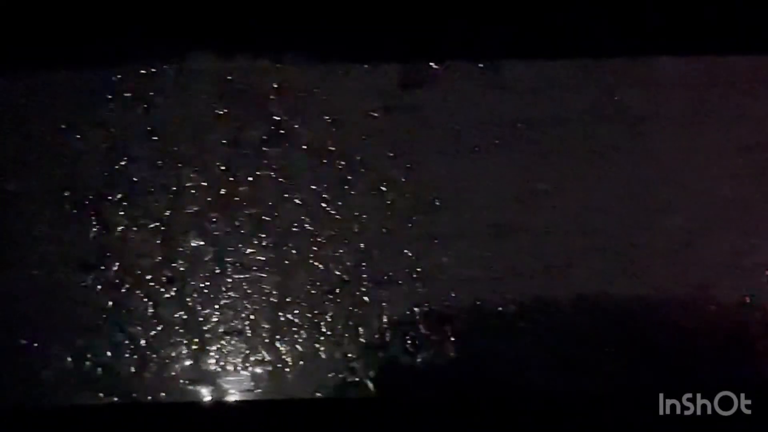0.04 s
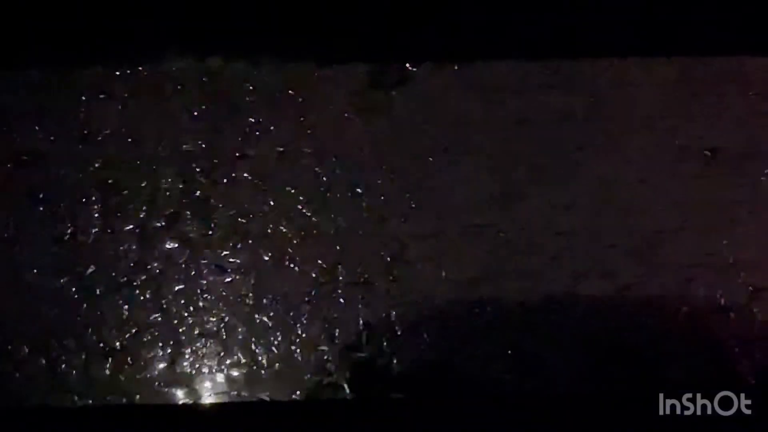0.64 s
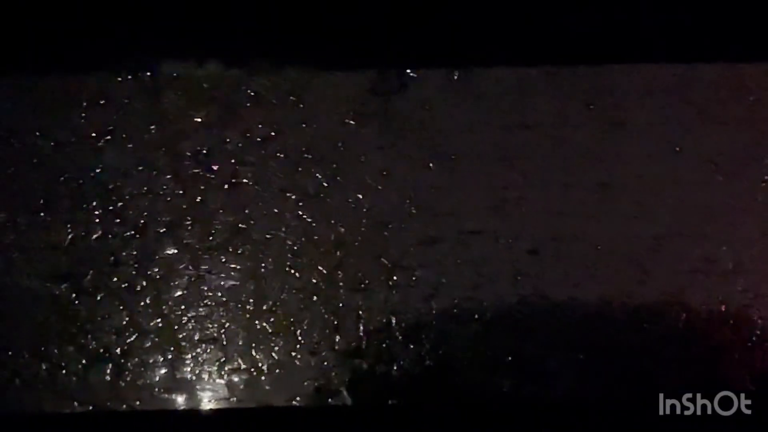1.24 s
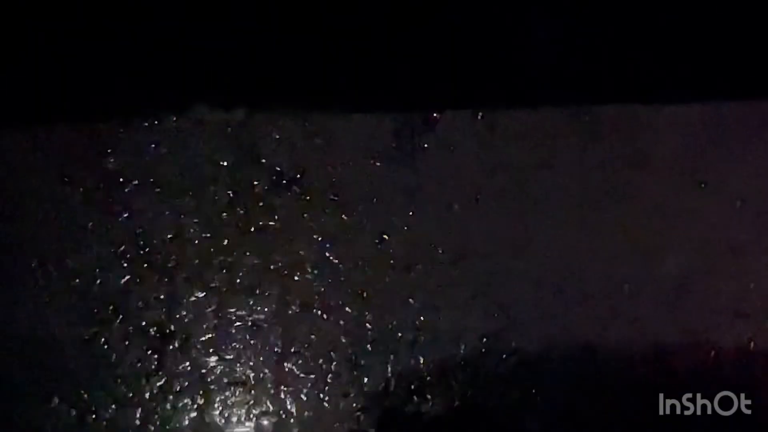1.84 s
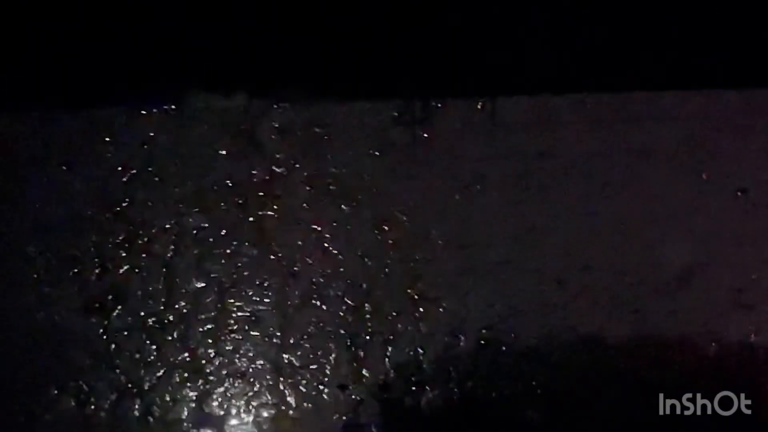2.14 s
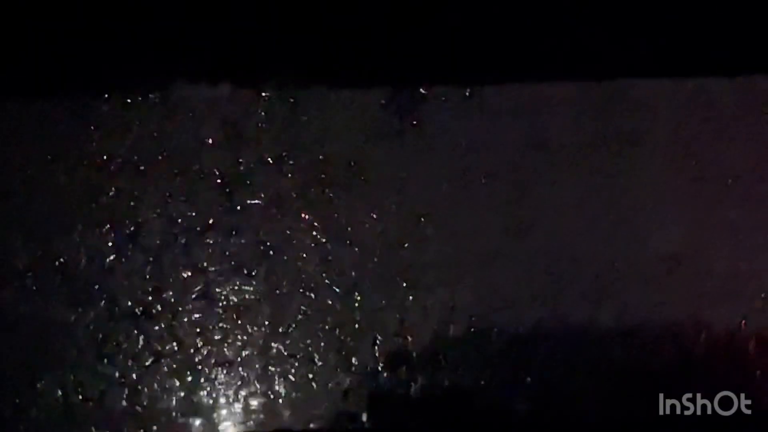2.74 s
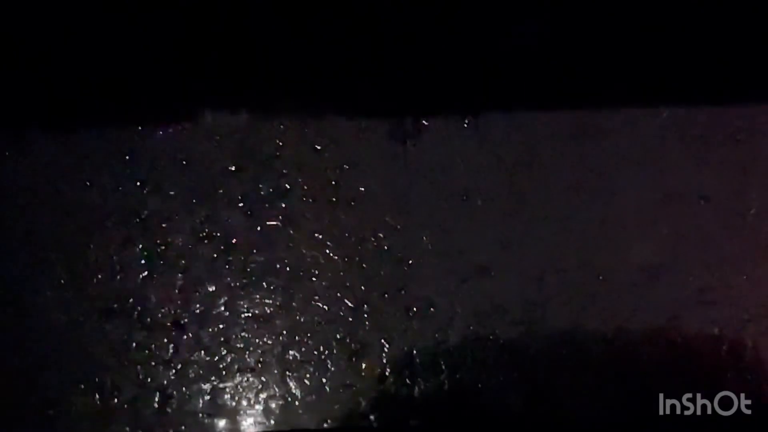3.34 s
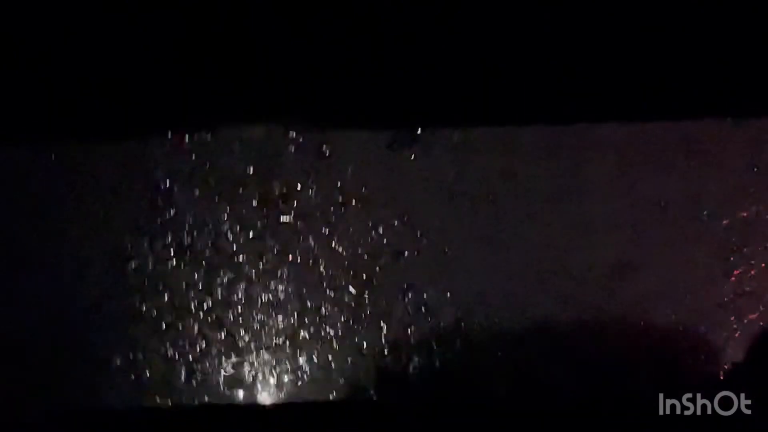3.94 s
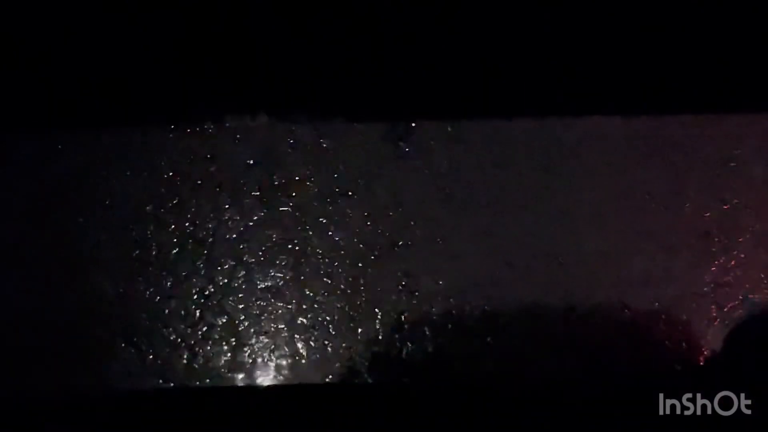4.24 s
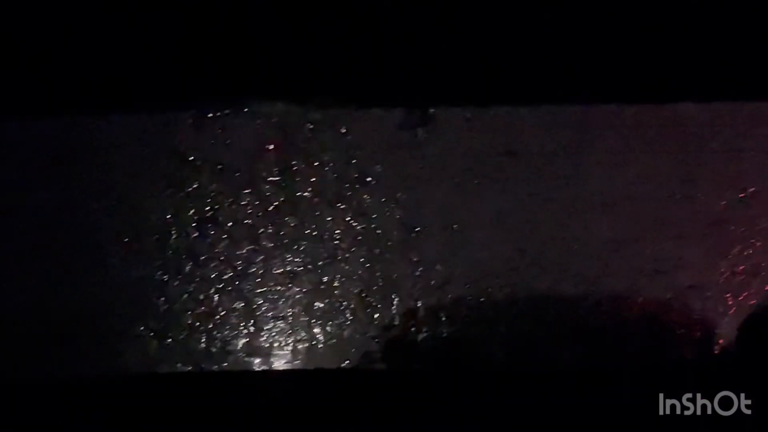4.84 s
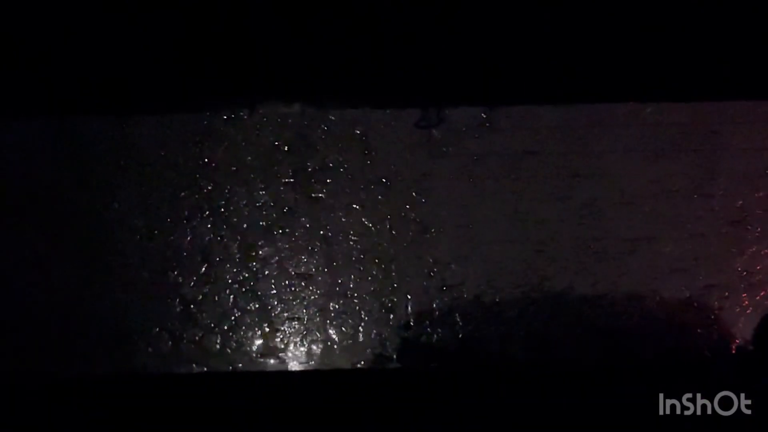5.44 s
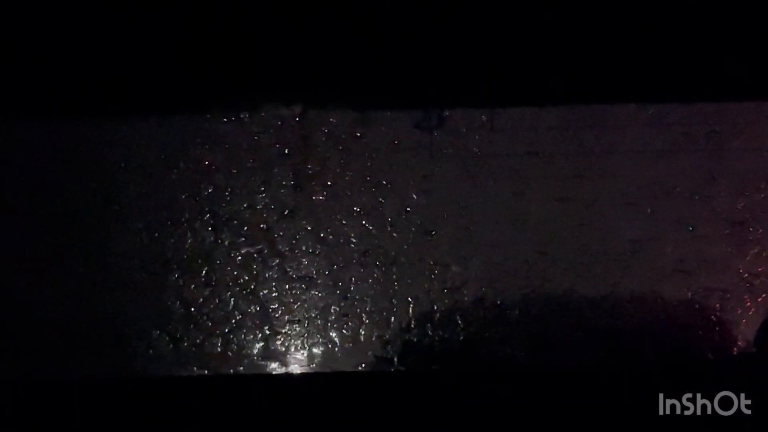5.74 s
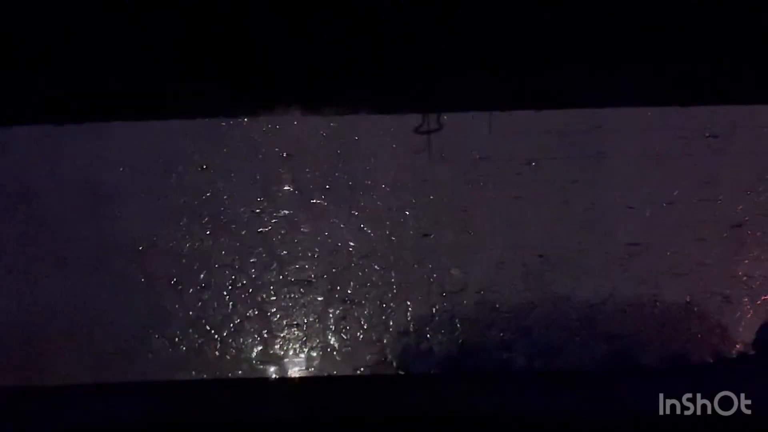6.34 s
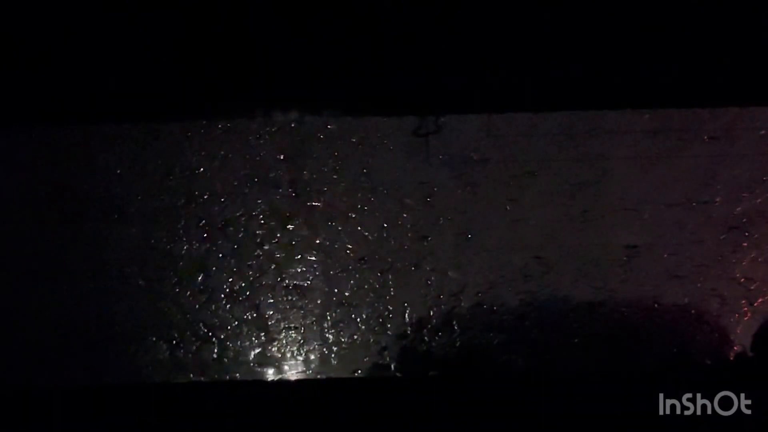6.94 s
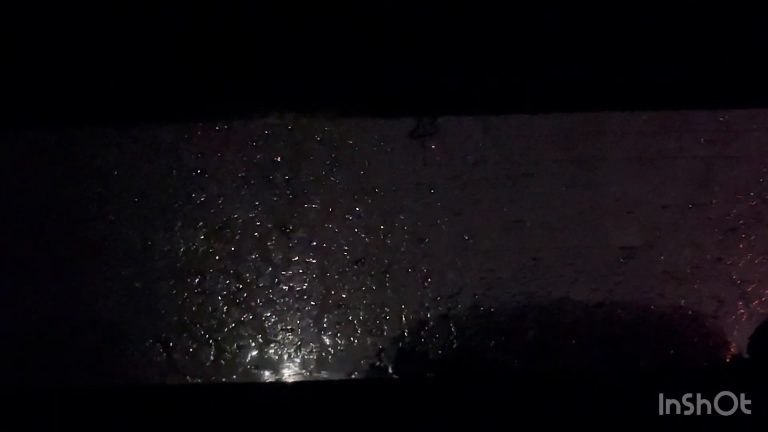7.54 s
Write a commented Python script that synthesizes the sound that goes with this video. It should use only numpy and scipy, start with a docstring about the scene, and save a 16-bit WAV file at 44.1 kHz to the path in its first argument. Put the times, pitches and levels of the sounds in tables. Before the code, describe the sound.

Steady rain patters on a car's roof and windows, heard from inside, over a low rumble that swells and fades.

```python
"""Steady rain on a parked car at night, heard from a stereo microphone inside the padded cabin.
From the start small drops patter on glass and steel roof, each ringing briefly, over a low rumble from
outside. Fat drops splat and thud overhead and tick on the nearest window; at 0.7 s a drip plops into
water. The rumble swells, booming in the cabin's lowest air resonance, and is at its height around 4 s.
Just before 5 s three heavy drips knock on a hollow panel; then the rumble fades under the rain."""
import sys
import numpy as np
from scipy import signal
from scipy.fft import rfft, irfft, next_fast_len
from scipy.io import wavfile
from scipy.ndimage import uniform_filter1d

SR = 44100
rng = np.random.default_rng(int(sys.argv[2]) if len(sys.argv) > 2 else 0)


def pcm_store(signal):
    """Save signal as 16-bit PCM."""
    levels = np.round(np.clip(np.atleast_2d(signal), -1, 1) * 32767)
    wavfile.write(sys.argv[1], SR, levels.astype(np.int16).T)


N = 335601
TIME = np.arange(N) / SR

# Strength of the shower on glass and roof. Each row: time in seconds, level in dB.
SHOWER_LEVEL = [(0, -39), (0.24, -45.5), (0.48, -46.5), (0.74, -47), (0.87, -43.5), (1.1, -48),
                (1.42, -41.5), (1.52, -48.5), (1.66, -41.5), (1.9, -47.5), (2.4, -46.5), (2.88, -46),
                (3.2, -47), (3.47, -52), (4.06, -44.5), (4.5, -49), (4.95, -43), (5.08, -50.5), (5.15, -42),
                (5.25, -47), (5.32, -43), (5.9, -44.5), (6.1, -41.5), (6.21, -47.5), (6.65, -42.5),
                (7.03, -47.5), (7.61, -47)]
# Tone of each source from inside the cabin. Each row: frequency in Hz, relative level in dB.
GLASS_SPECTRUM = [(300, -4.5), (700, -1), (1100, -6.5), (1500, -0.5), (2600, 0.5), (3400, 1), (5200, -5.5),
                  (6600, -10.5), (8600, -11), (10000, -10.5), (11300, -9.5), (12200, -34.5)]
ROOF_SPECTRUM = [(90, -22.5), (150, -3.5), (370, -3), (540, -4.5), (720, -4), (930, -5), (1060, -11.5),
                 (1250, -13), (1800, -15.5)]
BOOM_SPECTRUM = [(23, -27), (31, -6), (39, -20), (48, 0), (59, 1.5), (72, 4.5), (88, -0.5), (115, -4.5)]
ROAR_SPECTRUM = [(75, -10.5), (105, -2), (155, -0.5), (215, -5.5), (280, -11), (400, -12), (550, -22)]
SPLASH_SPECTRUM = [(500, 7), (2000, 5), (3000, 2.5), (4200, 3), (5600, -2), (7000, -5), (9000, -4.5),
                   (11500, -2), (12800, -38)]
THUD_SPECTRUM = [(150, -15.5), (330, 6), (550, 4.5), (900, 2.5), (1300, -11), (2500, -13), (6000, -42.5)]
TICK_SPECTRUM = [(500, 4), (2000, -0.5), (3400, 2), (4500, 2.5), (7000, -7.5), (11500, -10), (12800, -30)]
KNOCK_SPECTRUM = [(520, 1), (760, -1.5), (1350, -15), (2400, -14.5), (3000, -23), (9000, -26.5)]
# Resonances of glass, steel roof and cabin air. Each row: centre in Hz, width in Hz, lift in dB.
GLASS_RESONANCES = [(1498, 42, 4), (2180, 28, 4), (4100, 130, 6.5)]
ROOF_RESONANCES = [(338, 60, 5.5), (440, 100, 5), (624, 45, 6)]
AIR_RESONANCE = [(62.2, 32, 7)]
# Slow swell of the rumble outside. Each row: time in seconds, boom level in dB, roar level in dB.
RUMBLE_SWELL = [(0, -45.5, -48.5), (1.05, -45.5, -51.5), (2.1, -38, -42), (2.72, -34, -44),
                (3.15, -34, -38), (3.65, -27, -33.5), (4.0, -30, -35.5), (4.4, -30, -34), (4.63, -27, -28),
                (4.82, -43, -42.5), (5.18, -33, -33.5), (5.65, -37.5, -35.5), (5.95, -39, -35),
                (6.55, -40.5, -39), (7.05, -48, -46.5), (7.61, -48, -48.5)]
# Brief surges of the rumble. Each row: time of the peak in seconds, lift of the boom in dB.
RUMBLE_SURGES = [(1.34, 16.5), (2.22, 6), (2.35, 6.5), (2.91, 8), (3.04, 6.5), (3.31, 8), (3.6, 2),
                 (3.75, 1), (4.11, 2.5), (4.26, 8.5), (4.46, 4), (4.61, 3.5), (5.2, 5), (5.43, 9.5),
                 (5.83, 11), (6.53, 11.5), (6.8, 9)]
# Fat drops overhead. Each row: start in seconds, splash and thud levels in dB before trim,
# splash t60 in seconds.
ROOF_DROPS = [(0.008, -44.5, -47, 0.083), (0.619, -33.5, -31, 0.039), (0.634, -49, -43, 0.05),
              (0.696, -39.5, -42, 0.05), (0.794, -39.5, -41, 0.11), (1.122, -41.5, -49, 0.2),
              (1.143, -37, -41.5, 0.18), (1.195, -42, -41.5, 0.12), (1.596, -40, -36, 0.074),
              (1.62, -56, -45, .08), (1.674, -41, -42, 0.039), (1.745, -40, -35, 0.12),
              (2.172, -46, -45, 0.021), (2.674, -41, -40.5, 0.025), (2.931, -45, -50, 0.034),
              (2.949, -36, -39, 0.083), (3.787, -44, -37, 0.24), (3.898, -44.5, -41, 0.13),
              (4.025, -42.5, -40, 0.27), (4.404, -41, -41.5, 0.039), (5.106, -43, -43, 0.13),
              (5.168, -43.5, -41.5, 0.024), (5.355, -43, -43, 0.03), (5.467, -40.5, -44, 0.027),
              (5.62, -43, -40, 0.045), (6.095, -40.5, -45, 0.036), (6.162, -40.5, -48, 0.035),
              (6.489, -41, -43, 0.032), (6.613, -42.5, -49, 0.038), (6.693, -43.5, -40.5, .06),
              (7.112, -49, -39, 0.038), (7.273, -39.5, -54, 0.038)]
# Fat drops on the nearest window. Each row: start in seconds, level in dB before trim.
WINDOW_DROPS = [(0.102, -44), (0.521, -38), (0.9, -46), (1.037, -48.5), (1.071, -50.5), (1.254, -40.5),
                (1.312, -45), (1.347, -44), (1.922, -43), (2.014, -44), (2.027, -41), (2.844, -44.5),
                (3.346, -46), (3.54, -45.5), (3.7, -45), (3.714, -43), (4.091, -47), (4.189, -46),
                (4.202, -45.5), (4.236, -44), (4.25, -41), (4.72, -45), (4.756, -41.5), (4.983, -43.5),
                (5.13, -42.5), (5.3, -43), (5.42, -47), (5.511, -46), (5.535, -48), (5.563, -45),
                (5.65, -40.5), (5.801, -46), (5.949, -43), (5.981, -41), (6.151, -42), (6.197, -41),
                (6.243, -37.5), (6.335, -44.5), (6.602, -42), (7.578, -42.5)]
# A drip into standing water. One row: start in seconds, pitch in Hz, rise in Hz per second,
# peak level in dB, t60 in seconds.
PUDDLE_DRIP = (.711, 2050, 16000, -37, .04)
# Heavy drips on a hollow panel. Each row: start in seconds, level in dB.
PANEL_DRIPS = [(4.816, -33.5), (4.878, -38), (4.935, -36)]
# Stereo width of the cabin at the microphone. Each row: frequency in Hz, side minus mid in dB.
CABIN_WIDTH = [(20, -26), (45, -16), (70, -18), (130, -11.5), (350, -12), (800, -10), (1200, -3.5),
               (2200, -13), (4000, -15), (5000, -16), (6300, -28), (12000, -15)]
# Phase between the two microphone ports. Each row: frequency in Hz, lead of the left in radians.
PORT_PHASE = [(2200, 0), (3200, .65), (5800, 0), (7500, 0), (7900, .25), (8750, 0), (9470, -2),
              (10200, -3.14), (11850, -6.28)]


def undb(db):
    """Decibels to gain."""
    return 10 ** (np.asarray(db) / 20)


def unit(x):
    """Scale to an rms of 1."""
    return x / np.sqrt(np.mean(x ** 2))


def curve(table):
    """Rows of seconds and dB as a gain at every sample."""
    return undb(np.interp(TIME, *np.transpose(table)))


def decay(t, t60):
    """A ring dying away by 60 dB in t60 seconds."""
    return np.exp(-np.log(1000) * t / t60)


def steady(x, window_s):
    """Even out the slow swells of a noise, keeping its quick flutter."""
    return x / np.sqrt(uniform_filter1d(np.mean(x ** 2, axis=0), int(window_s * SR)))


def colour(x, spectrum, modes=(), skirt_db_per_octave=24):
    """Causal filter with a smooth outline, falling skirts and a few resonances on top."""
    size = next_fast_len(x.shape[-1] // 2 + 2048) * 2
    f = np.fft.rfftfreq(size, 1 / SR) + 1
    hz, db = np.transpose(spectrum)
    octaves_outside = np.abs(np.log2(f / np.clip(f, hz[0], hz[-1])))
    gain_db = np.interp(np.log(f), np.log(hz), db)
    gain_db -= skirt_db_per_octave * np.minimum(octaves_outside, 3)
    for centre, width, lift in modes:
        gain_db += lift / (1 + (2 * (f - centre) / width) ** 2)
    # minimum phase, so nothing rings ahead of an impact
    cepstrum = irfft(np.log(undb(gain_db)))
    cepstrum[1:size // 2] *= 2
    cepstrum[size // 2 + 1:] = 0
    return irfft(rfft(x, size) * np.exp(rfft(cepstrum)))[..., :x.shape[-1]]


def shifted(modes, share):
    """The spot a drop hits moves all resonances up or down together, by up to about this share."""
    shift = 1 + share * rng.uniform(-1.06, 1)
    return [(hz * shift, width, lift) for hz, width, lift in modes]


def diffuse(size, patchy_db=0):
    """Stereo noise of crossing reflections; with patchy_db the path to the microphone favours some bands."""
    f = np.fft.rfftfreq(size, 1 / SR) + 1
    hz, side_db = np.transpose(CABIN_WIDTH)
    mid, side = rfft(rng.standard_normal((2, size)))
    side *= undb(np.interp(np.log(f), np.log(hz), side_db))
    bands = np.geomspace(200, 13000, 14)
    path = undb(np.interp(f, bands, patchy_db * rng.uniform(-0.85, 1, len(bands))))
    return irfft(path * np.array([mid + side, mid - side]), size)


def ring(rise_s, t60, tail_db, tail_t60, size=8192):
    """One drop at the microphone: reflections build up, die fast and leave a cabin tail."""
    t = TIME[:size]
    build_up = (1 - np.exp(-t / rise_s)) ** 2
    envelope = build_up * (decay(t, t60) + undb(tail_db) * decay(t, tail_t60))
    return unit(diffuse(size, patchy_db=3.5)) * envelope / envelope.max()


def add_impact(out, start_s, db, sound):
    """Mix in one impact, with db as the rms of its loudest 10 ms."""
    at = int(start_s * SR)
    part = sound[:, :N - at]
    peak_power = uniform_filter1d(np.mean(sound ** 2, axis=0), SR // 100).max()
    out[:, at:at + part.shape[1]] += undb(db) * part / np.sqrt(peak_power)


def patter(per_s, spread_db, spots, **ring_shape):
    """Drops of many sizes land at random on several spots, each spot with a ring of its own."""
    out = np.zeros((2, N))
    for _ in range(spots):
        response = ring(**ring_shape)
        gap, softness, polarity = rng.random((2048, 3)).T
        arrivals_s = np.cumsum(-np.log(1 - gap)) * spots / per_s
        at = (arrivals_s * SR).astype(int)
        blows = np.sign(polarity - 0.5) * undb(-spread_db * softness)
        train = np.bincount(at[at < N], blows[at < N], N)
        out += signal.oaconvolve(train[None], response, axes=1)[:, :N]
    return unit(out)


def flurries(per_s=16, spread_db=1.8):
    """A gain that wanders at random as the drops bunch and thin out."""
    levels = rng.standard_normal(256)
    return undb(spread_db * np.interp(TIME * per_s, np.arange(len(levels)), levels))


def glass_rain(trim_db=-3.5, spray_db=-9):
    """Small drops tick in flurries on the windows around the microphone, over a wash of fine spray."""
    ticks = patter(per_s=380, spread_db=14, spots=20, rise_s=0.005, t60=0.017, tail_db=-26, tail_t60=0.06)
    spray = undb(spray_db) * unit(diffuse(N))
    glass = unit(colour(ticks + spray, GLASS_SPECTRUM, GLASS_RESONANCES))
    return glass * curve(SHOWER_LEVEL) * flurries() * undb(trim_db)


def roof_rain(trim_db=4, swing_share=0.45):
    """Drops drum on the steel overhead, dulled by its lining; the wide roof evens out the shower."""
    taps = patter(per_s=330, spread_db=21.5, spots=12, rise_s=0.0027, t60=0.18, tail_db=1, tail_t60=0.25)
    shower = curve(SHOWER_LEVEL)
    evened_shower = shower.mean() * (shower / shower.mean()) ** swing_share
    return unit(colour(taps, ROOF_SPECTRUM, ROOF_RESONANCES)) * evened_shower * undb(trim_db)


def rumble(boom_trim_db=-0.23, roar_trim_db=0.5, surge_s=0.044, roar_surge_share=0.35):
    """Noise from outside booms in the cabin's air, surging now and then; a dull roar rides above it."""
    swell = np.array(RUMBLE_SWELL)
    surge = undb(sum(lift * np.exp(-((TIME - s) / surge_s) ** 2) for s, lift in RUMBLE_SURGES))
    boom = steady(colour(diffuse(N), BOOM_SPECTRUM, AIR_RESONANCE), window_s=0.11)
    boom *= curve(swell[:, [0, 1]]) * surge
    roar = steady(colour(diffuse(N), ROAR_SPECTRUM), window_s=0.18)
    roar *= curve(swell[:, [0, 2]]) * surge ** roar_surge_share
    return undb(boom_trim_db) * boom + undb(roar_trim_db) * roar


def fat_drops(thud_trim_db=1.0):
    """Each fat drop splashes brightly overhead; the roof answers with a thud, pitched by the spot hit."""
    out = np.zeros((2, N))
    for start_s, splash_db, thud_db, splash_t60 in ROOF_DROPS:
        splash = ring(rise_s=0.0025, t60=splash_t60, tail_db=-19, tail_t60=0.13)
        thud = ring(rise_s=0.003, t60=0.18, tail_db=-20, tail_t60=0.24)
        spot_modes = shifted(ROOF_RESONANCES, share=0.18)
        add_impact(out, start_s, splash_db, colour(splash, SPLASH_SPECTRUM, GLASS_RESONANCES))
        add_impact(out, start_s, thud_db + thud_trim_db, colour(thud, THUD_SPECTRUM, spot_modes))
    return out


def window_ticks(trim_db=1.5):
    """On the stiff glass nearest the microphone a fat drop gives a short, sharp tick and no thud."""
    out = np.zeros((2, N))
    for start_s, db in WINDOW_DROPS:
        tick = ring(rise_s=0.002, t60=0.022, tail_db=-22, tail_t60=0.1)
        spot_modes = shifted(GLASS_RESONANCES, share=0.07)
        add_impact(out, start_s, db + trim_db, colour(tick, TICK_SPECTRUM, spot_modes))
    return out


def plop():
    """A drip traps a bubble in standing water; it rings and rises in pitch as it nears the surface."""
    start_s, hz, rise_hz_per_s, db, t60 = PUDDLE_DRIP
    t = np.maximum(TIME - start_s, 0)
    phase = 2 * np.pi * (hz + rise_hz_per_s * t / 2) * t
    return undb(db) * decay(t, t60) * np.sin(phase)


def hollow_knocks():
    """Heavy drips in a row knock on a body panel, which rings on hollowly."""
    out = np.zeros((2, N))
    for start_s, db in PANEL_DRIPS:
        knock = ring(rise_s=0.002, t60=0.15, tail_db=-20, tail_t60=0.24)
        add_impact(out, start_s, db, colour(knock, KNOCK_SPECTRUM))
    return out


def scene():
    """Inside the car: rain on glass and roof, single drops among it, the rumble underneath."""
    rain = glass_rain() + roof_rain()
    drops = fat_drops() + hollow_knocks() + window_ticks() + plop()
    return rain + drops + rumble()


def record(dry):
    """The microphone's two ports differ in phase near their resonance; the top is cut at 12.4 kHz."""
    hz, radians = np.transpose(PORT_PHASE)
    lead = np.interp(np.fft.rfftfreq(N, 1 / SR), hz, radians)
    left = irfft(rfft(dry[0]) * np.exp(1j * lead), N)
    top_cut = signal.ellip(8, 0.2, 70, 12400, fs=SR, output="sos")
    return signal.sosfilt(top_cut, np.array([left, dry[1]]))


dry = scene()
out = record(dry)
pcm_store(out)
```